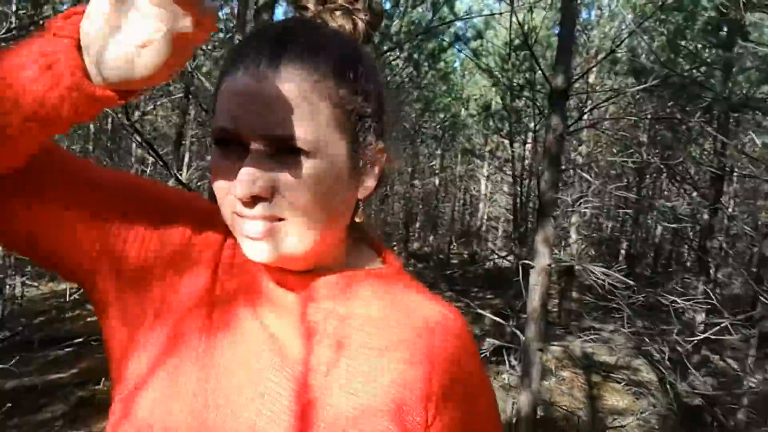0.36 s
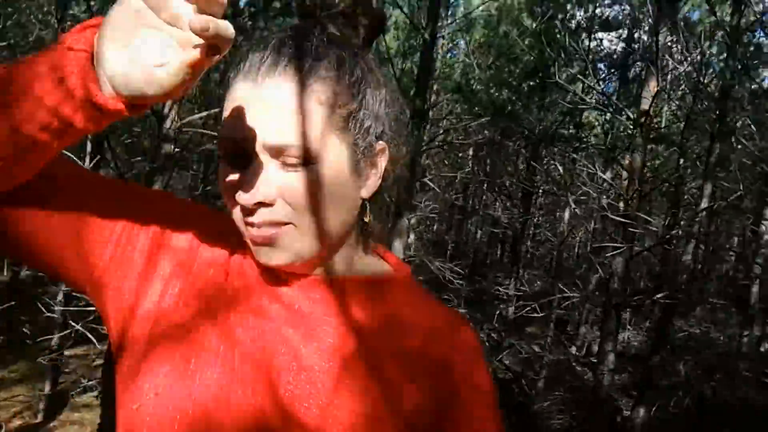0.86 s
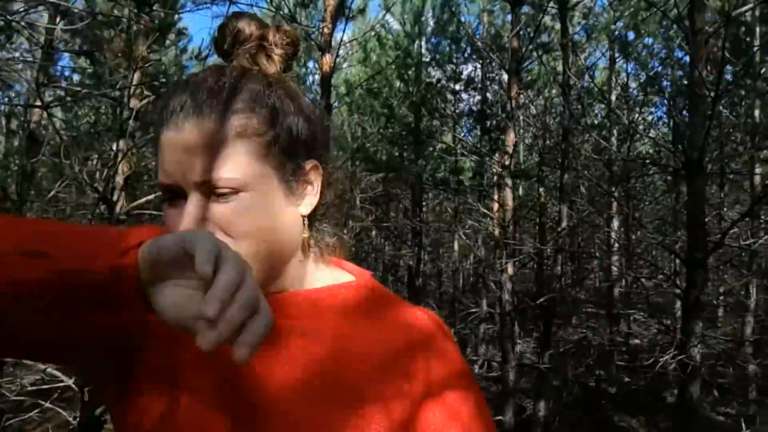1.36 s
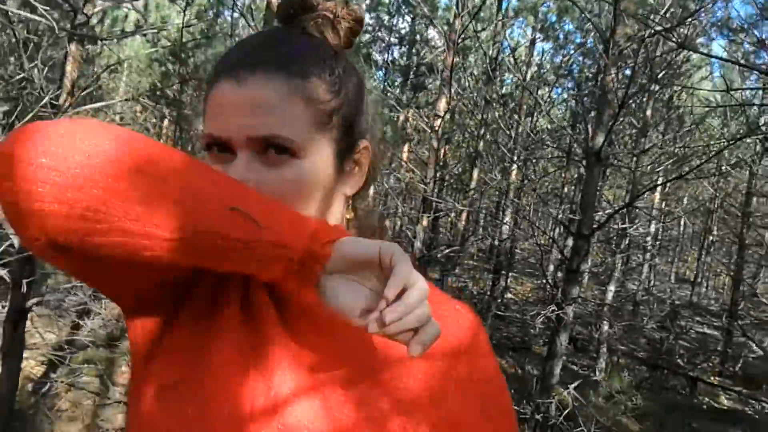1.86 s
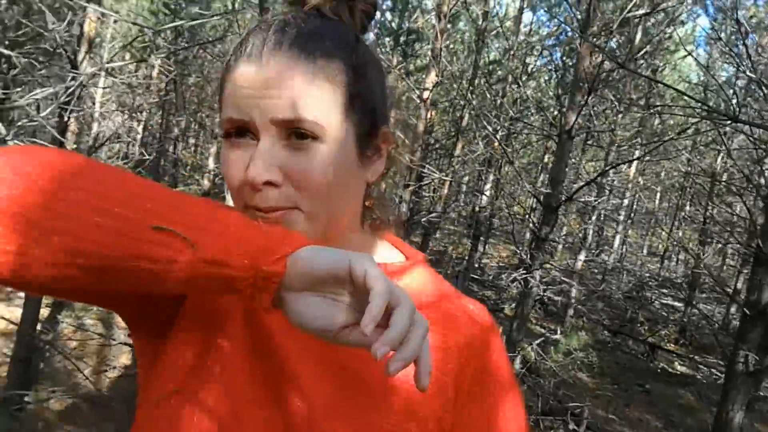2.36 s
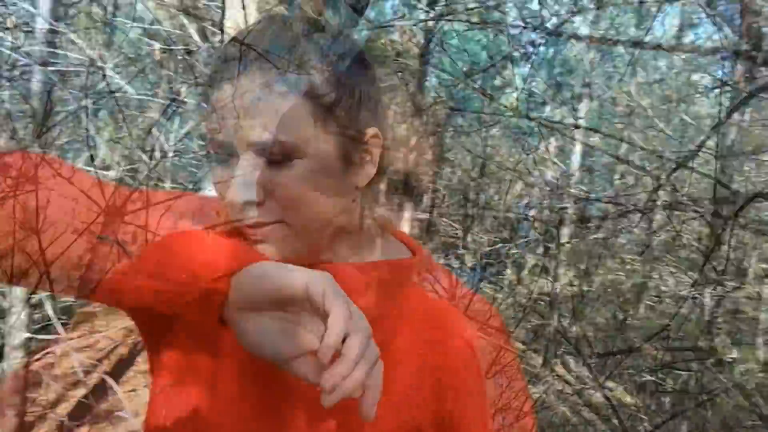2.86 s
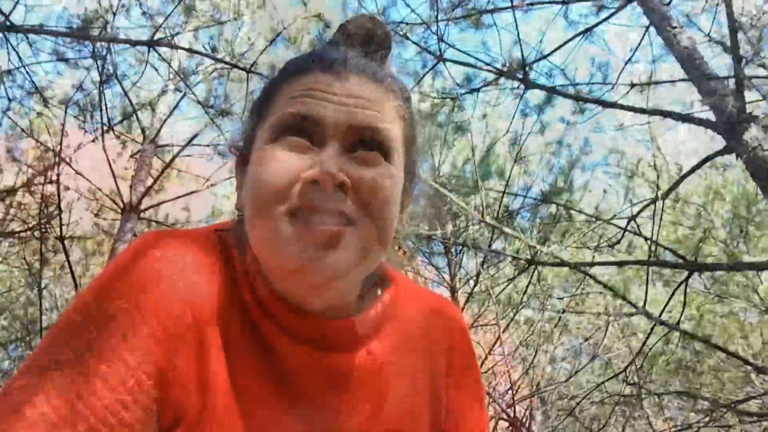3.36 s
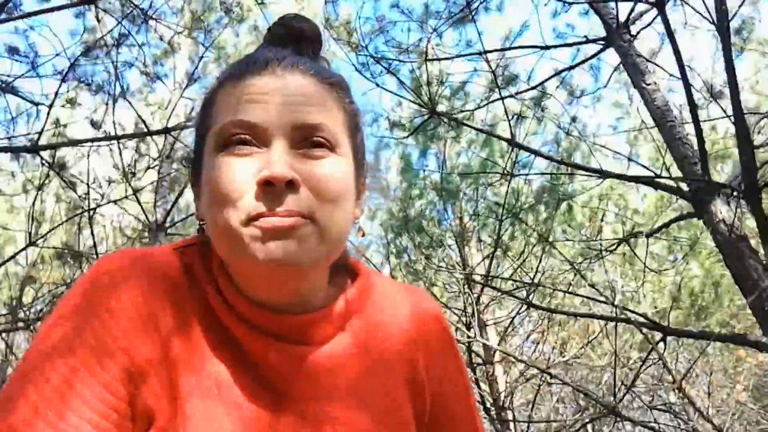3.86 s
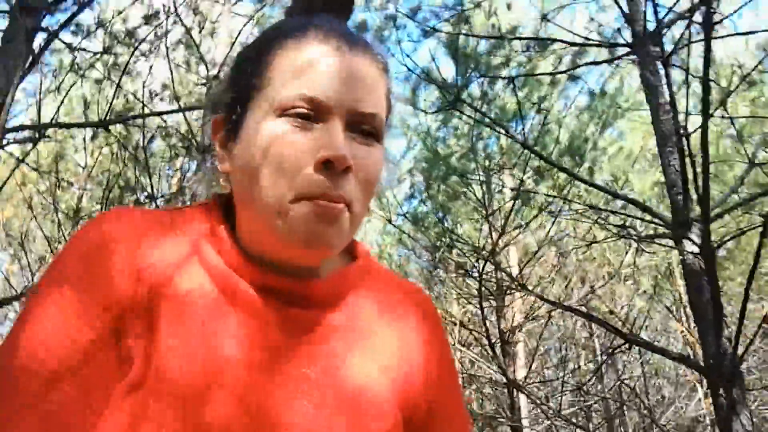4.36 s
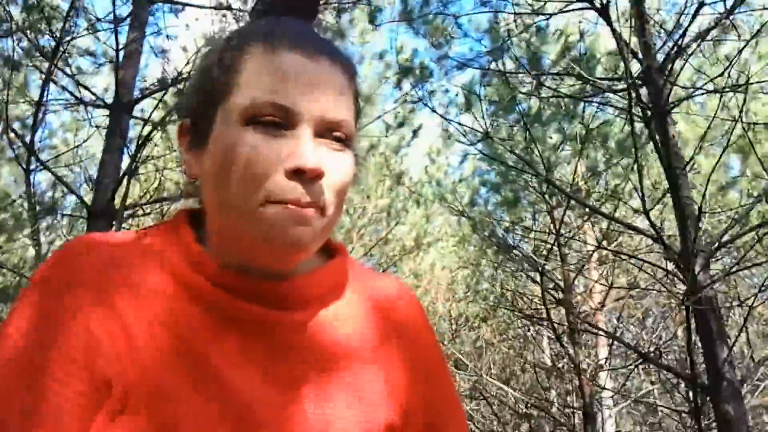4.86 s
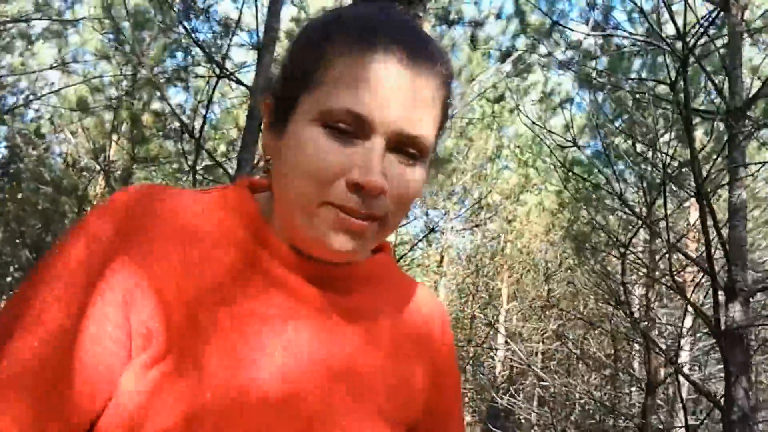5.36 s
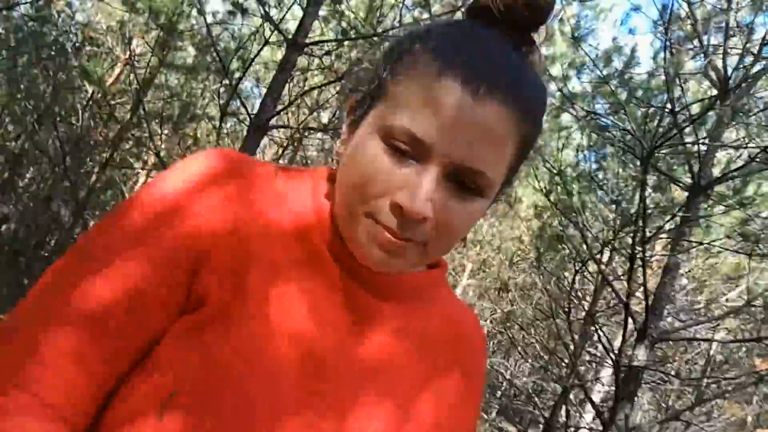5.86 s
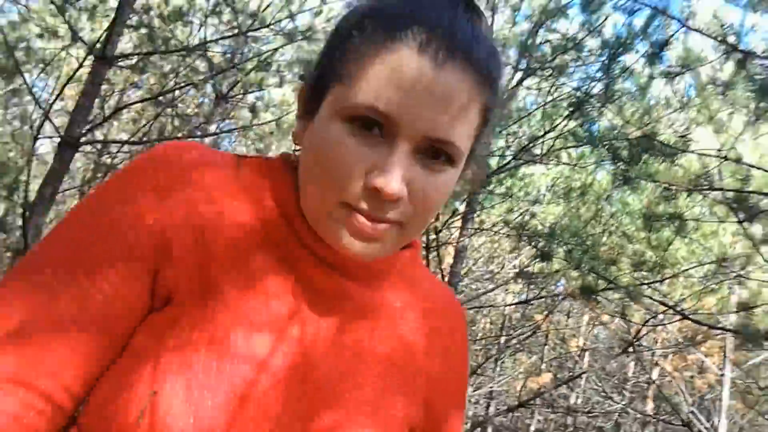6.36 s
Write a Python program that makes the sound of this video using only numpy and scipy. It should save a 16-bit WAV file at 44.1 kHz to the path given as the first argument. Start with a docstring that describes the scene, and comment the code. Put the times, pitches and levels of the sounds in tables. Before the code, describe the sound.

Dry twigs snap and branches scrape along a sleeve as someone pushes through dense dry woodland, wind buffeting the close microphone.

```python
"""Among dry young pines, someone pushes through, close to a hand-held microphone with two ports. Treetops hiss
far off and wind buffets the ports, both as shaped noise. Needles and boughs scrape along a sleeve: noise
roughened by small contacts. Dead twigs snap and sticks knock as noise bursts with resonant wood, sticks thud
into the arm, bark squeaks and a hollow branch drags and knocks: resonances excited by noise. The stems scatter
the twig sounds back as a short tail of decaying noise."""
import sys
import numpy as np
from scipy import signal
from scipy.fft import rfft, irfft, next_fast_len
from scipy.io import wavfile
from scipy.ndimage import uniform_filter1d, map_coordinates

SR = 44100
rng = np.random.default_rng(int(sys.argv[2]) if len(sys.argv) > 2 else 0)


def to_linear_factor(level_db):
    """Convert decibel levels (scalar or array-like) to linear amplitude factors."""
    exponent = np.asarray(level_db, float) / 20
    return 10 ** exponent


def master(y):
    """Save y as 16-bit WAV."""
    cut = np.clip(np.atleast_2d(y).T, -1, 1)
    pcm = np.round(cut * 32767)  # scale
    wavfile.write(sys.argv[1], SR, pcm.astype(np.int16))


N = 286650  # samples, 6.5 s
OPPOSED = np.array([[1], [-1]])  # signs for left and right


def unit(x):
    """Power normalisation: x scaled to rms 1."""
    return x / np.sqrt(np.mean(x ** 2) + 1e-20)


def along(points, hz):
    """Logarithmic frequency scale: (f/Hz, value) points joined by straight lines over log f."""
    f, v = np.transpose(points)
    return np.interp(np.log(hz + 1), np.log(f + 1), v)


def wobble(rate):
    """Slow random modulation: a smooth curve through random knots, rate of them a second."""
    knots = rng.standard_normal(N // 100)
    return map_coordinates(knots, [np.arange(N) * rate / SR])


def coloured(x, spectrum):
    """Linear filtering: x multiplied in frequency by a spectrum of (f/Hz, level/dB) points."""
    m = next_fast_len(x.shape[-1] + 4096)  # padded, so that the end does not wrap onto the start
    gain = to_linear_factor(along(spectrum, np.fft.rfftfreq(m, 1 / SR)))
    return irfft(rfft(x, m) * gain, m)[..., :x.shape[-1]]


def resonant(x, hz, width_hz):
    """Resonance: x through two equal peaks in cascade, for steep skirts, rms 1."""
    peak = signal.iirpeak(hz, hz / width_hz, SR)
    once = signal.lfilter(*peak, x)
    return unit(signal.lfilter(*peak, once))


def after(s, t60, attack=.001):
    """Exponential decay: silence until s, a soft start (time constant attack, s), then 60 dB lost in t60."""
    t = np.maximum(np.arange(N) / SR - s, 0)
    return (1 - np.exp(-t / attack)) * to_linear_factor(-60 * t / t60)


def swells(rows, rest_db):
    """Addition of powers: each row rises to its peak and falls away, all upon a resting level."""
    t = np.arange(N) / SR
    power = to_linear_factor(2 * rest_db)
    for s, db, rise, fall in rows:
        drop = 20 * np.where(t < s, (s - t) / rise, (t - s) / fall)  # dB below the peak
        power = power + to_linear_factor(2 * (db - drop))
    return np.sqrt(power)


# Likeness of the sound at the two ports: f/Hz, left-right correlation
ALIKE = [(60, 0.88), (200, 1), (550, 0.051), (2000, 0.21), (15000, 1)]


def rush(spectrum, pair):
    """Partial coherence: two unrelated signals mixed to the ports' correlation, rms 1."""
    hz = np.fft.rfftfreq(N, 1 / SR)
    turn = np.arccos(np.clip(along(ALIKE, hz), -1, 1)) / 2
    weights = [np.cos(turn), np.sin(turn)]
    mid, side = irfft(rfft(pair) * to_linear_factor(along(spectrum, hz)) * weights, N)
    return unit(np.array([mid + side, mid - side]))


# Spectrum of the far treetops: f/Hz, level/dB
TREETOPS = [(120, -16), (300, 0.5), (1200, 0), (2500, -12.5), (6500, -23.5), (10000, -18), (15600, -31),
            (16100, -57.5)]


def treetops():
    """Broadband turbulence noise: the far, smooth hiss of the wood, its level drifting slowly."""
    level_db = -60.5 + 0.68 * wobble(0.79)
    return to_linear_factor(level_db) * rush(TREETOPS, rng.standard_normal((2, N)))


# Spectrum of wind noise at the ports: f/Hz, level/dB
RUMBLE = [(20, -12), (42, 2.5), (110, -7), (200, -17), (350, -17.5), (900, -63.5)]
# Wind striking the ports: peak t/s, peak level/dB, rise over 20 dB t/s, fall over 20 dB t/s
GUSTS = [(.36, -46.5, 0.24, 0.46), (.96, -45, 0.23, 0.39), (1.48, -52.5, 0.082, 0.25),
         (3.22, -39, 0.58, 0.77), (4.27, -34, 0.16, 0.97), (5.15, -33.5, 0.6, 0.52),
         (5.93, -37.5, 1.5, 0.067), (6.5, -29.5, .15, .2)]
# Sudden puffs: t/s, level/dB, f/Hz
POPS = [(3.212, -30.5, 48.8), (3.233, -27.5, 56.2), (4.314, -25.5, 106.6), (4.36, -20, 117),
        (4.501, -20.5, 82.6), (4.546, -24.5, 100.9), (5.237, -19, 113.4), (5.401, -23.5, 102),
        (5.895, -21, 137.5)]


def wind():
    """Pressure fluctuation: lumpy buffeting, and single puffs that push the diaphragm out and back."""
    calm_db = -68.5  # what goes on between gusts
    lumps = to_linear_factor(3.2 * wobble(28))
    buffeting = unit(lumps * rush(RUMBLE, rng.standard_normal((2, N))))
    out = swells(GUSTS, calm_db) * buffeting
    t = np.arange(N) / SR
    for s, db, hz in POPS:
        u = np.maximum(t - s, 0) * hz  # cycles since the puff began
        out += to_linear_factor(db) * np.sin(2 * np.pi * u) * np.exp(-(u / 0.75) ** 2)
    return out


def grit(rate, spread_db, life_s, share):
    """Stick-slip roughness: noise strengthened at random tiny contacts of uneven size, rate a second."""
    hits = (rng.random(N) < rate / SR) * to_linear_factor(spread_db * rng.standard_normal(N))
    bursts = signal.lfilter([1], [1, -np.exp(-1 / (life_s * SR))], hits)
    return rng.standard_normal((2, N)) * (1 + share * unit(bursts))


def patchy(x, depth_db):
    """Spectro-temporal modulation: x with patches of random gain over time and frequency."""
    z = signal.stft(x, nperseg=512)[2]
    field = rng.standard_normal(z.shape[1:])
    field = uniform_filter1d(field, size=5, axis=0)
    field = uniform_filter1d(field, size=12, axis=1)
    return signal.istft(z * to_linear_factor(depth_db * unit(field)), nperseg=512)[1][:, :N]


def crackle(count, centre_hz, cycles, spread_db):
    """Damped free vibration: twiglets and bark flakes ring at random pitch, size and side, rms 1."""
    when, side = rng.random((2, count, 1))
    pitch, size = rng.standard_normal((2, count, 1))
    k = np.arange(300)  # samples in each ring
    turns = np.clip(centre_hz * to_linear_factor(4.5 * pitch), 500, 14000) * k / SR
    rings = to_linear_factor(spread_db * size) * np.sin(2 * np.pi * turns) * np.exp(-turns / cycles)
    at = ((when * N).astype(int) + k).ravel()
    ports = [np.bincount(at, (rings * np.sqrt(g)).ravel(), N)[:N] for g in (side, 1 - side)]
    return unit(np.array(ports))


# Spectrum of needles on a sleeve: f/Hz, level/dB
SCRATCH = [(1200, -22), (2500, -0.5), (4400, -2), (7000, -3), (10500, -1), (15600, -11.5), (16100, -51.5)]
# Spectrum of boughs on cloth: f/Hz, level/dB
RUB = [(150, -9), (400, -8), (1000, -6.5), (1500, -9.5), (2600, -18.5), (5000, -24.5), (9000, -64.5)]
# Needles raking along the sleeve: peak t/s, peak level/dB, rise over 20 dB t/s, fall over 20 dB t/s
SCRATCHES = [(.15, -42.5, 1.5, 0.18), (.89, -40, 0.024, 0.18), (1.06, -40.5, 0.026, 0.12),
             (1.91, -52, 0.21, 0.178), (2.148, -33.5, 0.012, 0.11), (2.366, -35, 0.012, 0.069),
             (2.392, -30, 0.0094, 0.023), (2.43, -41, 0.083, 0.14), (2.55, -38.5, .03, .04),
             (2.57, -48, 0.36, 0.14), (2.95, -67.5, 1.3, 14), (3.05, -54.5, 0.017, 1.7),
             (3.47, -44.5, 0.63, 0.21), (3.59, -45.5, 0.16, 0.024), (3.96, -58.5, 0.064, 2.6),
             (4.22, -39.5, 0.038, 0.38), (4.52, -28.5, 0.086, 0.38), (4.69, -35, 0.64, 0.033),
             (5.05, -47, 1.2, 2.6), (6.03, -53.5, 1.1, .15), (6.09, -49, 0.086, 0.095),
             (6.5, -45.5, 0.23, .3)]
# Thicker boughs dragging over cloth: peak t/s, peak level/dB, rise over 20 dB t/s, fall over 20 dB t/s
RUBS = [(.25, -48.5, 0.54, 0.15), (.91, -54.5, 0.079, 0.26), (2.37, -41.5, 0.058, 0.34),
        (2.58, -46, 0.17, 0.053), (3.43, -42.5, 0.5, 0.19), (3.59, -40, 0.65, 0.017),
        (4.03, -48.5, 0.11, 4.4), (4.64, -36, 0.36, 0.47), (5.1, -47, 1, 3.46), (6.5, -37, 0.092, .2)]


def brush():
    """Friction noise: needles scratch brightly, thicker boughs rub duller; both shed small crackles."""
    needles_rest_db, boughs_rest_db = -75, -67  # what goes on between strokes
    tug = wobble(23.86)  # both catch and let go together
    needle_grit = grit(rate=200, spread_db=6, life_s=0.002, share=0.5)
    needles = rush(SCRATCH, patchy(needle_grit, depth_db=1.8))
    needles += to_linear_factor(-8) * crackle(count=2500, centre_hz=6000, cycles=2.2, spread_db=4.5)
    bough_grit = grit(rate=150, spread_db=6, life_s=0.004, share=0.3)
    boughs = rush(RUB, patchy(bough_grit, depth_db=3))
    boughs += to_linear_factor(-6) * crackle(count=4000, centre_hz=2800, cycles=2, spread_db=4.5)
    scratching = swells(SCRATCHES, needles_rest_db) * to_linear_factor(1.6 * tug) * needles
    rubbing = swells(RUBS, boughs_rest_db) * to_linear_factor(1.8 * tug + 1.5 * wobble(35)) * boughs
    return scratching + rubbing


# Spectrum of a crack, before its random variation: f/Hz, level/dB
CRACK = [(300, -13), (1400, -1), (4500, 2), (6500, 0.5), (10000, 6), (15500, -0.5), (17000, -43.5)]
# Twigs breaking, and a few sticks knocking: t/s, snap level/dB, wood level/dB relative to the snap, wood f/Hz #
# (levels before the fixed trims of crack and wood below)
SNAPS = [(0.0443, -6, -14, 3030), (0.116, -12.5, -15.5, 1920), (0.161, -9.5, -11, 3300),
         (0.37, -35.5, -22.5, 3390), (0.575, -55.5, 7.5, 1510), (1.0375, -0.5, -12.5, 4330),
         (1.0848, -8, -20, 1280), (1.7128, -34, -15, 3480), (2.155, -14, -13.5, 700),
         (2.264, -16.5, -18.5, 4640), (2.2729, -22, -13, 5530), (2.323, -29, 3.5, 1100),
         (2.3613, -20.5, -9, 900), (2.5464, -22.5, -6.5, 5150), (2.5771, -17, -14, 670),
         (2.594, -28, -9, 905), (3.0297, -17, -17.5, 2690), (3.256, -23.5, -21, 4240),
         (3.3346, -18, -20, 1796), (3.395, -40, 6, 1470), (3.437, -27, -11, 2930), (3.446, -10, -16, 3550),
         (3.474, -28.5, -8, 8500), (3.4869, -35, 2.5, 2930), (3.498, -37.5, 0, 1390),
         (3.571, -21.5, -18, 1500), (3.581, -36.5, 1, 1550), (3.9385, -42, -9.5, 3540),
         (3.957, -40, -7, 3600), (4.064, -39.5, -4.5, 900), (4.074, -49, 1, 2940),
         (4.1009, -51, 16.5, 1270), (4.2107, -25.5, -14, 5370), (4.268, -21, -13.5, 880),
         (4.4903, -9, -19.5, 765), (4.5236, -13.5, -9.5, 3900), (4.5808, -14, -19.5, 1670),
         (4.643, -35.5, 4.5, 900), (4.688, -18, -33, 5400), (5.02, -35, -0.5, 1440), (5.439, -6, -30, 4300),
         (6.06, 0, -24, 1430), (6.1056, -19, -24, 4580), (6.147, -23.5, -37, 1010),
         (6.246, -21.5, -45, 1130)]


def snaps():
    """Brittle fracture: fibres give, the stick cracks and tears on in splinters; its wood sounds dully. A few
    sticks that only knock are played the same way."""
    out, t = np.zeros((2, N + SR)), np.arange(SR // 5) / SR
    give = 0.0029  # s from first fibre to full break

    def fall(t60):
        """Exponential decay from the full break, with a weak level before it."""
        return np.where(t < give, to_linear_factor(-25), to_linear_factor(-60 * (t - give) / t60))

    for s, db, wood_db, hz in SNAPS:
        noise = rng.standard_normal((4, len(t)))
        tearing = to_linear_factor(7.43 * unit(uniform_filter1d(noise[2], size=60)))  # splinters come in clumps
        tearing_gain = to_linear_factor(-13 + 0.19 * db)  # more from big sticks
        shape = fall(0.0059) + tearing_gain * tearing * fall(0.063)
        colour = np.add(CRACK, [0, 2.2] * rng.standard_normal((len(CRACK), 1)))  # no two sticks alike
        colour[:2, 1] += 0.35 * db  # thin twigs have no bottom
        crack = unit(coloured(noise[:2] * shape, colour))
        crack *= to_linear_factor(-8.0) * np.sqrt(np.mean(shape ** 2))
        struck = noise[3] * np.sqrt(tearing) * fall(0.016)
        wood = to_linear_factor(wood_db - 16) * resonant(struck, hz, 0.65 * hz)
        lean = to_linear_factor(rng.normal(0, 0.99) * OPPOSED)  # towards one port
        width = to_linear_factor(-5.0) * crack[1] * OPPOSED  # each port hears its own reflections
        start = round(s * SR)
        out[:, start:start + len(t)] += to_linear_factor(db) * (lean * (crack[0] + wood) + width)
    return out[:, :N]


# Scatter among the stems: f/Hz, reverberation time t60/s
TRUNKS = [(300, 0.11), (3000, 0.13)]


def trunks(x):
    """Reverberation: sound scattered back by the stems, each frequency dying at its own speed."""
    hz, t, z = signal.stft(rng.standard_normal((2, SR // 3)), SR, nperseg=256)
    decay = to_linear_factor(-60 * t / along(TRUNKS, hz)[:, None])
    tail = signal.istft(z * decay, SR, nperseg=256)[1]
    return signal.fftconvolve(x, tail / np.linalg.norm(tail[0]), axes=1)[:, :N]


# Sticks thudding into the arm: t/s, level/dB
THUDS = [(1.039, -23), (1.087, -30.5), (2.139, -31.5), (2.156, -17.5), (2.326, -27), (2.364, -31),
         (4.49, -28.5), (6.061, -35.5)]


def thuds():
    """Heavily damped impact: dull blows on the arm, as low, wide resonances dying in 0.05 s."""
    out = 0
    for s, db in THUDS:
        out = out + to_linear_factor(db) * after(s, .05) * resonant(rng.standard_normal(N), 200, 330)
    return out


# Bark creaking on bark: t/s, f/Hz, level/dB, t60/s
SQUEAKS = [(3.552, 4830, -38, .13), (3.615, 5050, -52, .25), (4.01, 1800, -41, .12), (4.0, 1000, -42, .2)]


def squeaks():
    """Narrow-band friction: bark squeaks briefly on bark, as noise through a sharp resonance."""
    out = 0
    for s, hz, db, t60 in SQUEAKS:
        out = out + to_linear_factor(db) * after(s, t60, .005) * resonant(rng.standard_normal(N), hz, 90)
    return out


# Resonances of a hollow dead branch: f/Hz, width of each peak f/Hz, relative level/dB
BRANCH = [(950, 300, -7), (1460, 320, 0), (2600, 450, -4), (5000, 400, -21)]
# Blow on the branch: t/s, level/dB, t60/s
KNOCK = (5.5375, -23, 0.089)
# The branch dragging along: peak t/s, peak level/dB, rise over 20 dB t/s, fall over 20 dB t/s
DRAGS = [(5.03, -41.5, 0.78, 0.05), (5.56, -41, 0.023, 0.41)]


def branch():
    """Modal resonance: one hollow dead branch drags along and is knocked, sounding the same modes."""
    modes = [to_linear_factor(level) * resonant(rng.standard_normal(N), hz, width) for hz, width, level in BRANCH]
    body = unit(sum(modes))
    s, db, t60 = KNOCK
    return body * (to_linear_factor(db) * after(s, t60) + swells(DRAGS, -np.inf))


def scene():
    """Superposition: every source added at the two ports, the twig sounds with their scatter."""
    twigs = snaps() + thuds() + squeaks() + branch()
    scatter = to_linear_factor(-13.5) * trunks(twigs)
    return treetops() + wind() + brush() + twigs + scatter


def top_cut(x):
    """Nothing passes above the cut-off."""
    return signal.sosfilt(signal.butter(12, 16710, fs=SR, output="sos"), x)


# Phase by which the left port leads the right: f/Hz, phase/rad
LEAD = [(50, -0.039), (600, 1.12), (1500, -1.24), (3000, -1.83), (7000, -0.75)]


def record(dry):
    """Interchannel phase: the two ports differ by half the lead each way; peaks clip at full scale."""
    lead = along(LEAD, np.fft.rfftfreq(N, 1 / SR))
    turn = np.exp(.5j * lead * OPPOSED)
    mix = np.clip(irfft(rfft(dry) * turn, N), -1, 1)
    return top_cut(mix)


dry = scene()
out = record(dry)
master(out)
```